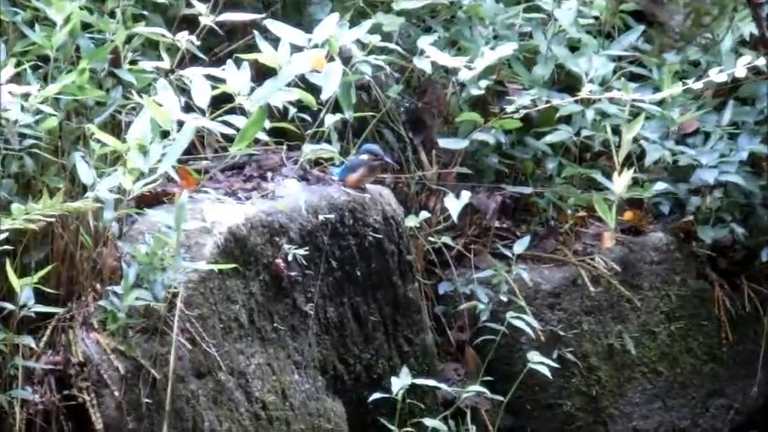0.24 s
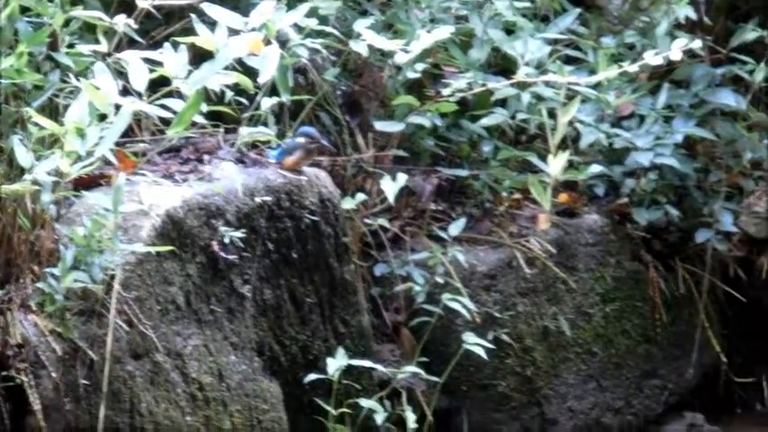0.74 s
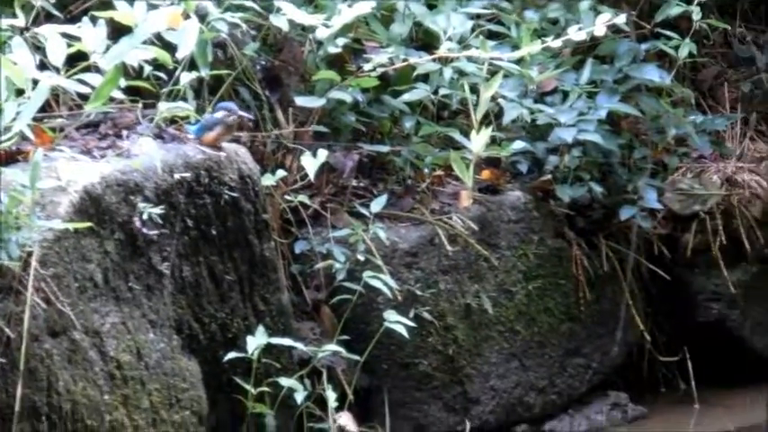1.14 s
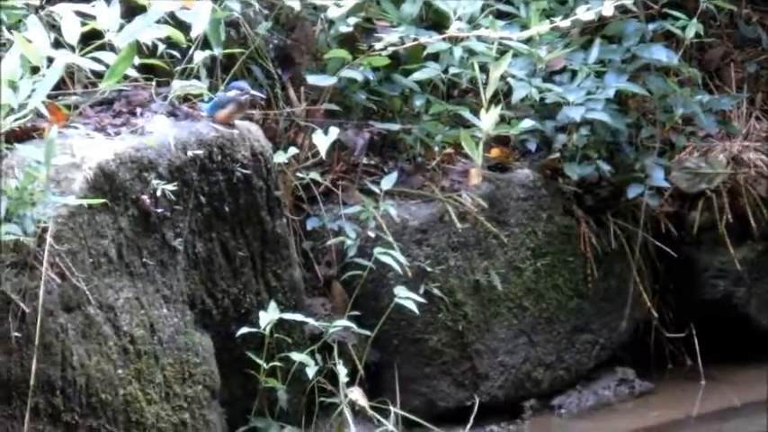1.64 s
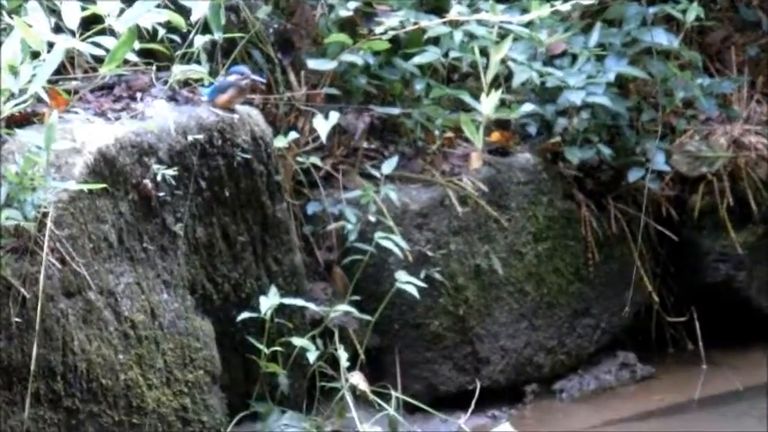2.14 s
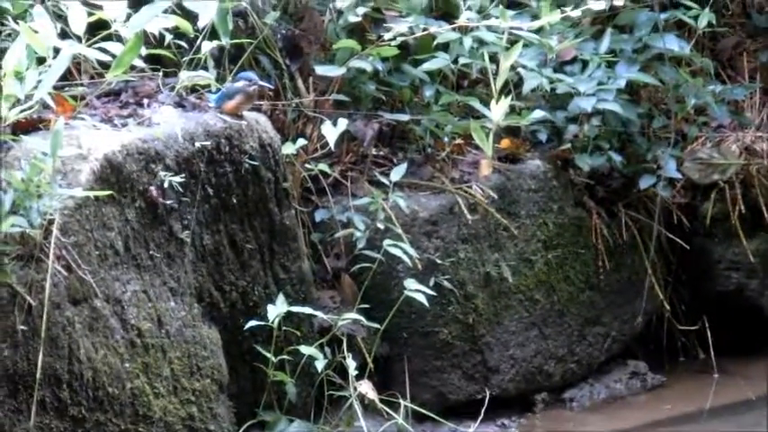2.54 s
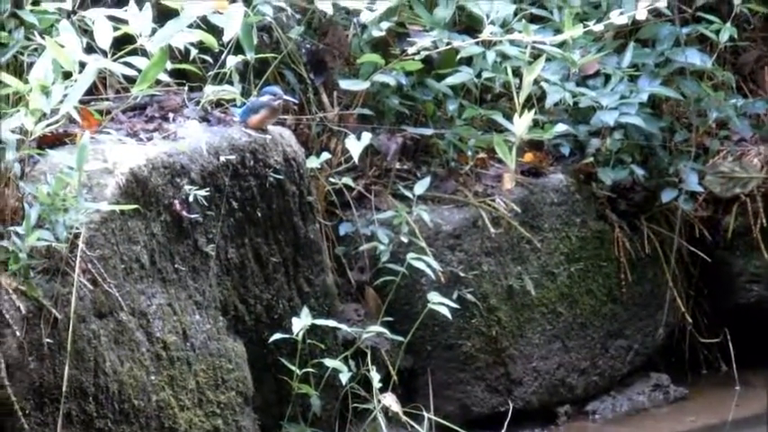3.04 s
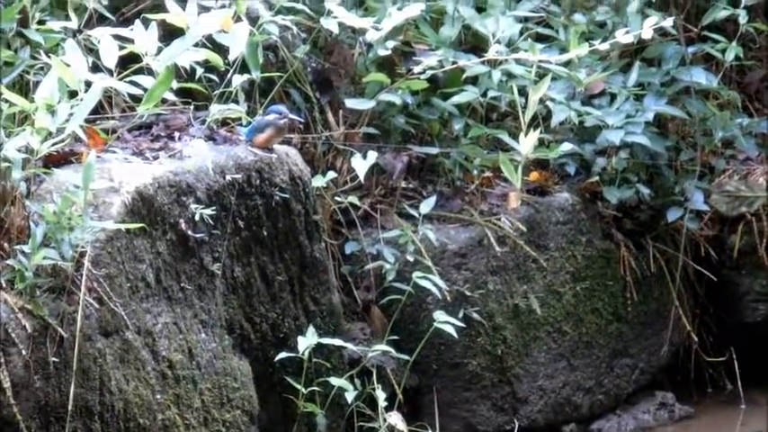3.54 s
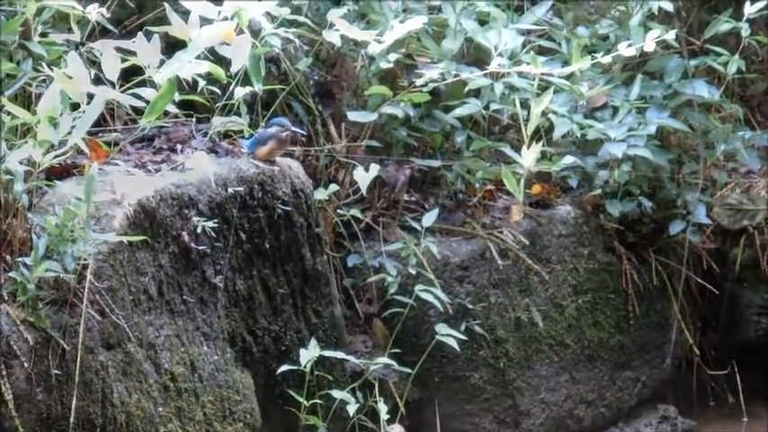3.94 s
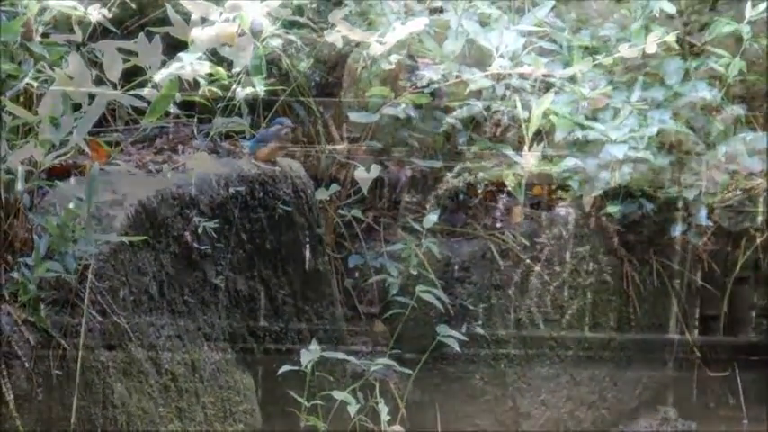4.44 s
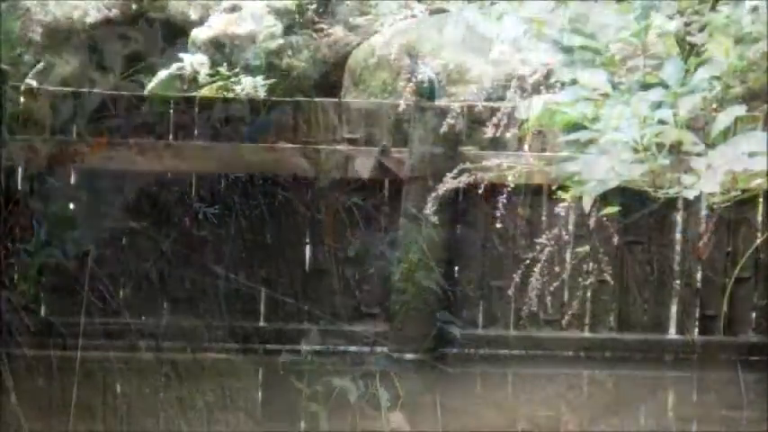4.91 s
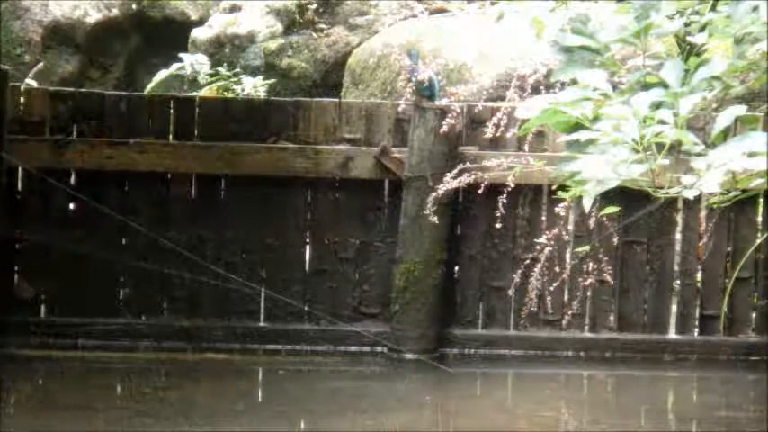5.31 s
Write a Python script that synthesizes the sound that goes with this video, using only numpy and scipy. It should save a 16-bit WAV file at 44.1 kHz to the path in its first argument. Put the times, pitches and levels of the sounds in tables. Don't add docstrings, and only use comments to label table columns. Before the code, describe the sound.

A dense, shrill cicada chorus over leaf hiss slowly sinks, then swells again as water drums into a pool and one insect buzzes close.

```python
import sys
import numpy as np
from scipy import signal
from scipy.io import wavfile
from scipy.ndimage import uniform_filter1d

SR = 44100
rng = np.random.default_rng(int(sys.argv[2]) if len(sys.argv) > 2 else 0)


def master_out(mix):
    frames = np.transpose(np.atleast_2d(mix))
    ceiling = np.clip(frames, -1, 1)
    pcm = np.round(ceiling * 32767).astype(np.int16)
    wavfile.write(sys.argv[1], SR, pcm)


def rack_gain(trim_db):
    fader = np.asarray(trim_db, float)
    return 10 ** (fader / 20)


N = 245637
T = np.arange(N) / SR
HZ = np.fft.rfftfreq(1024, 1 / SR)

# time in seconds, level in dB.
CHORUS_FADE = [(0, -22), (.2, -21), (.22, -22.5), (.28, -21.5), (.7, -22), (1, -22.5), (1.6, -23.5),
               (1.9, -24), (2.5, -25.8), (3.1, -27.5), (3.7, -30.5), (4.1, -33), (4.34, -33), (4.7, -32),
               (5, -29.5), (5.2, -28), (5.57, -27)]
# time in seconds, share from 0 to 1.
POND_SHARE = [
    (0, 0.02),
    (4.0, 0.13),
    (5.0, 1),
    (5.57, 0.8),
]
# frequency in Hz, difference in dB.
POND_COLOUR = [(30, 4), (300, -1.5), (1500, -1.5), (3000, 0), (4500, 1.5), (7000, 0), (9500, -2.5),
               (12000, -5), (14000, -2.5), (15700, -5)]
# frequency in Hz, density in dB per Hz.
AIR_SPECTRUM = [(13, -33), (22, 2.5), (49, 2), (125, -3), (183, -2), (313, -2.5), (1080, -3), (1550, -4.5),
                (1970, -2.5), (2600, -12.5), (3380, -17), (5720, -120)]
# frequency in Hz, density in dB per Hz.
LOW_SONG = [(820, -42), (1400, -21), (1540, -21), (1910, -19.5), (2920, -15.5), (3690, -9.5), (4120, -5.5),
            (5490, -1), (6280, -1.5), (7820, -7.5), (9020, -14.5), (9820, -13), (10500, -12), (13600, -32),
            (22000, -120)]
# frequency in Hz, density in dB per Hz.
HIGH_SONG = [(5000, -34), (8500, -16), (9100, -18.5), (9800, -15.5), (11000, -2.5), (12500, 0), (14200, 3),
             (14800, 5.5), (15100, -7), (15500, -13), (15800, -6)]
# frequency in Hz, left-right likeness from -1 to 1.
PORT_LIKENESS = [(60, 0.24), (99, 0.15), (160, 0.26), (270, 0.049), (450, 0.12), (740, 0.22), (1220, 0.03),
                 (2010, 0.19), (3330, 0.5), (5500, 0.76), (9080, 0.33), (15000, 0.11)]
# frequency in Hz, left minus right in dB.
PORT_BALANCE = [(60, -1), (110, -2.5), (200, -1.5), (380, -0.98), (700, -2.6), (1290, -1.5), (2380, -2),
                (4400, -1.2), (8120, -1.149), (15000, -2.1)]
# frequency in Hz, lead of the left in radians.
PORT_LEAD = [(0, 0.044), (3700, -0.025), (4220, -0.44), (4820, -0.24), (7240, -0.73), (9470, -0.45),
             (10700, -0.63), (10900, 0.1), (12700, -1.4), (13200, -0.1), (14200, -0.9), (14800, 0.2),
             (15800, -1.0)]
# time in seconds, level in dB.
WATER_LEVEL = [
    (4.2, -68),
    (4.33, -58),
    (4.55, -51.5),
    (4.61, -60),
    (4.79, -55),
    (4.86, -59.5),
    (5.17, -49.5),
    (5.33, -49),
    (5.52, -44.5),
]
# resonance in Hz, width in Hz, level in dB.
POOL_AIR = [
    (60, 50, -10),
    (140, 50, -5),
    (187, 55, 0),
    (260, 50, -14),
    (366, 30, -9),
    (650, 250, -17),
]
# start in seconds, length in seconds, first Hz, last Hz, level in dB.
RASP_STROKES = [
    (0.0, .14, 1900, 2100, -53),
    (.83, .13, 1720, 2050, -53),
    (.93, .16, 1850, 2080, -53),
    (1.81, .15, 1760, 2050, -52.5),
    (1.93, .17, 1880, 2250, -53),
    (2.68, .1, 1280, 1420, -60),
    (2.83, .14, 1700, 2190, -54),
    (3.87, .12, 1740, 1850, -57),
]
# first burst in seconds, last burst in seconds,
# first level and last level in dB against the chorus.
THROB_RUNS = [(.126, .187, -6, -5), (.259, .4, -5, -5), (.46, .763, -5, -4), (.82, 1.014, -4, -5),
              (1.08, 1.26, -6, -6), (1.32, 1.872, -3.5, -6), (1.93, 2.537, -7, -7), (2.599, 3.013, -3, -7),
              (3.085, 3.317, -4, -8), (3.4, 3.52, -8, -7), (3.579, 3.755, -8, -3.5),
              (3.815, 4.115, -6, -6.5), (4.18, 4.727, -9, -8.5), (4.818, 4.94, -8, -10),
              (5.039, 5.098, -9, -6), (5.203, 5.42, -7, -6)]
# frequency in Hz, level in dB.
STEADY_BODY = [(3200, -13), (3550, -14), (3900, -9), (4300, -4), (4600, -6), (5000, -12), (5670, 0),
               (6500, -12)]
# start in seconds, length in seconds,
# first clicks per second, last clicks per second, level in dB.
PHRASES = [(.22, .17, 353, 362, -2), (.35, .26, 347, 358, 0), (.56, .2, 357, 354.5, -3),
           (1.04, .31, 354, 356, -5.5), (1.4, .3, 346, 352, -7), (1.62, .2, 352, 357, -4),
           (1.79, .24, 359, 369, -2), (2.56, .22, 364.5, 362.5, -3), (4.55, .28, 354.5, 369, -2),
           (4.79, .26, 368.5, 378, -6), (4.81, .25, 359, 368, -2)]
# start in seconds, length in seconds,
# frequency in Hz, level in dB.
LONE_OVERTONES = [(.1, .12, 3855, 0), (.47, .12, 3984, 0), (.87, .17, 3876, -2), (1.4, .17, 3984, 0),
                  (1.71, .26, 5180, -3), (2.14, .26, 4575, -3), (2.93, .26, 5652, -2),
                  (3.09, .2, 4554, -1.5), (3.54, .26, 3887, -3), (4.34, .26, 3898, -1), (.42, .14, 5330, 2),
                  (1.66, .14, 4250, -2), (2.56, .1, 5093, 1), (3.29, .1, 5085, 0), (4.83, .1, 5430, 0),
                  (4.9, .11, 5120, 4)]
# frequency in Hz, level in dB against the chorus.
OVERTONE_BODY = [(3200, -24), (3900, -18.5), (4250, -10.5), (4650, -11), (5000, -11), (5350, -8.5),
                 (5800, -14)]
# time in seconds, body resonance in Hz, level in dB.
BUZZ_BODY = [
    (5.0, 14300, -60),
    (5.09, 14200, -38),
    (5.14, 14150, -41),
    (5.2, 14050, -34),
    (5.28, 13700, -34),
    (5.34, 13250, -35),
    (5.4, 14200, -38),
    (5.48, 13700, -36),
    (5.57, 13900, -39),
]
# frequency in Hz, level in dB against
MASKING_LIMIT = [(900, -20), (1500, -4), (2400, -4), (3200, -1), (3800, -3), (4500, -12), (7800, -12),
                 (9000, -3), (10000, -4), (11000, -14), (15000, -10), (15400, -5)]
# frequency in Hz, gain in dB.
TREBLE_TOP = [(15000, 0), (15190, -1), (15295, -18), (15390, 1), (15500, 7), (15740, 8), (15750, -120)]


def evened(x):
    return x / np.sqrt(np.mean(abs(x) ** 2) + 1e-20)


def read(points, hz):
    f, value = np.transpose(points)
    return np.interp(np.log(hz + 1), np.log(f + 1), value)


def curve(rows, column=1):
    rows = np.array(rows)
    return np.interp(T, rows[:, 0], rows[:, column])


def add(mix, start_s, sound):
    part = mix[round(start_s * SR):][:len(sound)]
    part += sound[:len(part)]


def wander(per_s, count=1):
    knots = rng.standard_normal((count, 400))
    return 1.22 * np.array([np.interp(T * per_s, np.arange(400), row) for row in knots])


def resonate(x, hz, width_hz):
    turn = np.exp(2j * np.pi * np.cumsum(hz * np.ones(len(x))) / SR)
    r = np.exp(-np.pi * width_hz / SR)
    return 2 * (turn * signal.lfilter([1 - r], [1, -r], x / turn)).real


def glide(length_s, first_hz, last_hz):
    n = round(length_s * SR)
    return np.linspace(first_hz, last_hz, n), signal.windows.tukey(n, .5)


def ports(a, b):
    za, zb = (signal.stft(v, nperseg=1024, noverlap=768)[2] for v in (a, b))
    same = np.clip(read(PORT_LIKENESS, HZ), -1, 1)[:, None]
    lean = (rack_gain(read(PORT_BALANCE, HZ) / 2) * np.exp(.5j * read(PORT_LEAD, HZ)))[:, None]
    right = same * za + np.sqrt(1 - same ** 2) * zb
    return np.array([za * lean, right / lean])


def coloured(z, spectrum, patchy_db):
    patches = rng.standard_normal(z.shape[1:])
    patches = uniform_filter1d(patches, size=14, axis=0)
    patches = evened(uniform_filter1d(patches, size=16, axis=1))
    frame_at = np.minimum(np.arange(z.shape[2]) * 256, N - 1)
    pond = np.clip(curve(POND_SHARE)[frame_at], 0, 1)
    shape_db = read(spectrum, HZ)[:, None] + read(POND_COLOUR, HZ)[:, None] * pond + patchy_db * patches
    return evened(signal.istft(z * rack_gain(shape_db), nperseg=1024, noverlap=768)[1][:, :N])


def chorus_db(forest_db, pond_db):
    pond = np.clip(curve(POND_SHARE), 0, 1)
    return curve(CHORUS_FADE) + forest_db + (pond_db - forest_db) * pond


def foliage(x, t60_s):
    t = np.arange(SR // 3) / SR
    hits = rng.random((2, len(t))) < .05
    taps = hits * rng.choice([-1., 1.], (2, len(t))) * rack_gain(-60 * t / t60_s)
    return signal.fftconvolve(x[None], taps / np.linalg.norm(taps[0]), axes=1)[:, :N]


def air():
    field = ports(*rng.standard_normal((2, N)))
    level_db = chorus_db(forest_db=-22.5, pond_db=-21.5)
    return rack_gain(level_db) * coloured(field, AIR_SPECTRUM, patchy_db=-0.55)


def clicks(per_s, spread, jitter, count):
    out = np.zeros(N)
    for pace, start, sign in rng.random((count, 3)):
        step = SR / (per_s * (1 + spread * (2 * pace - 1)))
        k = np.arange(int(N / step * 1.1))
        drift = np.cumsum(np.interp(k / 80, np.arange(60), .012 * rng.standard_normal(60)))
        off_time = jitter * rng.standard_normal(len(k))
        at = ((k + start + drift + off_time) * step).astype(int)
        at = at[(at >= 0) & (at < N)]
        out += np.sign(sign - .5) * np.bincount(at, minlength=N)
    return evened(out)


def crowd(per_s, spectrum, level_db, patchy_db, blur):
    a, b = ((1 - blur) * clicks(per_s, spread=.12, jitter=.03, count=16) + blur * rng.standard_normal(N)
            for _ in range(2))
    return rack_gain(level_db) * coloured(ports(a, b), spectrum, patchy_db)


def water():
    late = T > WATER_LEVEL[0][0]
    chance, size, sign = rng.random((3, late.sum()))
    lumps = (chance < 900 / SR) * rack_gain(-2 * np.log(size + .02)) * np.sign(sign - .5)
    sway = 1 + 0.035 * wander(14., count=len(POOL_AIR))[:, late]
    rung = 0
    for (hz, width_hz, db), s in zip(POOL_AIR, sway):
        ring = resonate(resonate(lumps, hz * s, width_hz), hz * s, 2 * width_hz)
        rung = rung + rack_gain(db) * evened(ring)
    level_db = curve(WATER_LEVEL) + 0.5 * wander(11)[0]
    out = np.zeros(N)
    out[late] = rack_gain(level_db[late]) * evened(rung)
    return out


def rasps():
    out = np.zeros(N)
    for start_s, length_s, first_hz, last_hz, db in RASP_STROKES:
        hz, swell = glide(length_s, first_hz, last_hz)
        fuzzy = resonate(resonate(rng.standard_normal(len(hz)), hz, 210), hz, 210)
        add(out, start_s, rack_gain(db + 2.2) * evened(fuzzy) * swell)
    return out


def throbs():
    gap_s, burst_s = .0605, 0.044
    level = np.zeros(N)
    for first_s, last_s, first_db, last_db in THROB_RUNS:
        count = round((last_s - first_s) / gap_s) + 1
        for s, db in np.linspace((first_s, first_db), (last_s, last_db), count):
            add(level, s - .02, rack_gain(db + 1.2) * signal.windows.hann(round(burst_s * SR)))
    z = ports(*rng.standard_normal((2, N)) * level * rack_gain(curve(CHORUS_FADE)))
    body_db = read([(9000, -24.5), (11000, -26.0), (13000, 2.0), (14500, 3.0), (15300, -3.0), (15900, -15.0)], HZ)
    return signal.istft(z * evened(rack_gain(body_db))[:, None], nperseg=1024, noverlap=768)[1][:, :N]


def steady_singer():
    clicks_hz, under_chorus_db = 354.4, -18.5
    turns = np.cumsum(clicks_hz * (1 + .0015 * wander(6.)[0])) / SR
    orders = range(10, 19)
    fading = wander(9., count=len(orders))
    stack = 0
    for k, fade in zip(orders, fading):
        body = rack_gain(read(STEADY_BODY, k * clicks_hz))
        stack = stack + body * fade * np.cos(2 * np.pi * k * turns)
    return rack_gain(curve(CHORUS_FADE) + under_chorus_db) * evened(stack)


def overtones():
    out = np.zeros(N)
    quiver, beats = wander(45.)[0], wander(12., count=17)
    lines = [(s, length_s, k * first, k * last, db, k)
             for s, length_s, first, last, db in PHRASES for k in range(9, 17)]
    lines += [(s, length_s, hz, hz, db, 0) for s, length_s, hz, db in LONE_OVERTONES]
    for start_s, length_s, first_hz, last_hz, db, k in lines:
        hz, swell = glide(length_s, first_hz, last_hz)
        start = round(start_s * SR)
        here = slice(start, start + len(hz))
        line = np.sin(2 * np.pi * np.cumsum(hz + 8 * quiver[here]) / SR + k * k)
        level_db = db + read(OVERTONE_BODY, hz) + 1.5 * beats[k, here]
        add(out, start_s, line * rack_gain(level_db) * swell)
    return out * rack_gain(curve(CHORUS_FADE))


def buzz():
    clicks_per_s, sag_per_s2 = 200.8, 10.5
    late = T > BUZZ_BODY[0][0]
    body_hz, db = (curve(BUZZ_BODY, column=k)[late] for k in (1, 2))
    turns = np.cumsum(clicks_per_s - sag_per_s2 * (T[late] - BUZZ_BODY[0][0])) / SR
    stack = sum(np.cos(2 * np.pi * k * turns + 0.045 * k * k) for k in range(55, 81))
    drive = evened(stack) + .3 * rng.standard_normal(len(turns))
    out = np.zeros(N)
    out[late] = rack_gain(db) * evened(resonate(resonate(drive, body_hz, 1700), body_hz, 2600))
    return out


def scene():
    low_db, high_db = chorus_db(forest_db=-2, pond_db=-2), chorus_db(forest_db=-.5, pond_db=1.5)
    far = air() + crowd(360., LOW_SONG, low_db, patchy_db=0.34, blur=0.56)
    far = far + crowd(200., HIGH_SONG, high_db, patchy_db=-0.2, blur=0.57) + throbs()
    pool = water() * rack_gain(np.array([[-.8], [.8]]))
    singers = rasps() + steady_singer() + overtones()
    near = singers * rack_gain(np.array([[-1.], [-.1]])) + rack_gain(-11) * foliage(singers, t60_s=.12)
    high = buzz()
    near = near + high * rack_gain(np.array([[1.], [-2.5]])) + rack_gain(-8.) * foliage(high, t60_s=.1)
    return far + pool + near


def band_limit(x):
    return signal.sosfilt(signal.butter(12, 16250, fs=SR, output="sos"), x)


def record(dry):
    pair = np.array([[1, 1], [1, -1]]) / np.sqrt(2)
    hz, _, z = signal.stft(pair @ dry, SR, nperseg=2048, noverlap=1024)
    power = abs(z) ** 2
    around = uniform_filter1d(uniform_filter1d(power.mean(0), size=24, axis=0), size=9, axis=1)
    thrift = rng.standard_normal(around.shape)
    thrift = evened(uniform_filter1d(uniform_filter1d(thrift, size=6, axis=0), size=2, axis=1))
    limit = around * rack_gain(read(MASKING_LIMIT, hz)[:, None] + 4 * thrift) ** 2
    kept = power / (power + limit ** 3 / (power + 1e-30) ** 2)
    shaped = z * kept * rack_gain(read(TREBLE_TOP, hz))[:, None]
    thinned = signal.istft(shaped, SR, nperseg=2048, noverlap=1024)[1][:, :N]
    return band_limit(pair @ thinned)


dry = scene()
out = record(dry)
master_out(out)
```